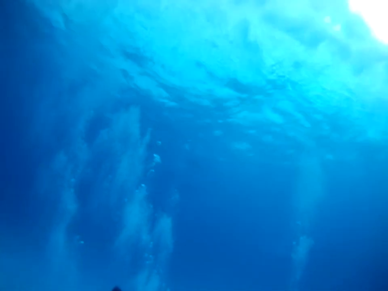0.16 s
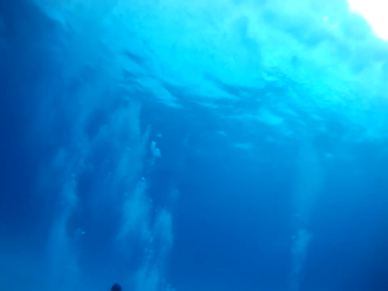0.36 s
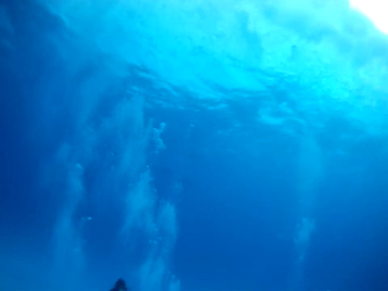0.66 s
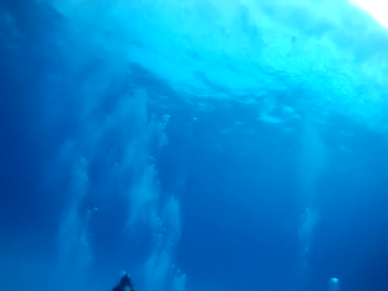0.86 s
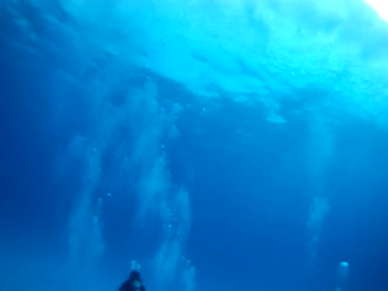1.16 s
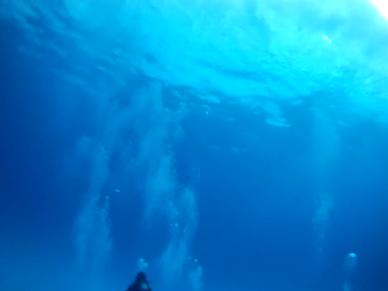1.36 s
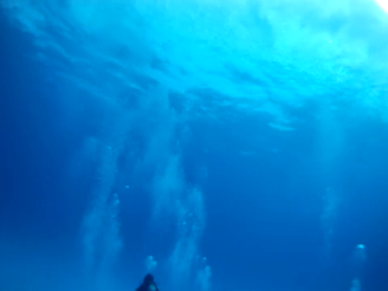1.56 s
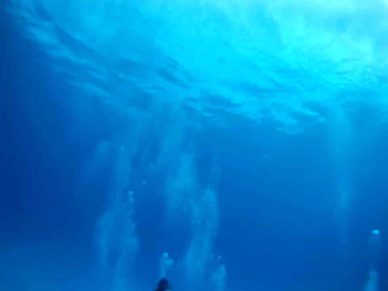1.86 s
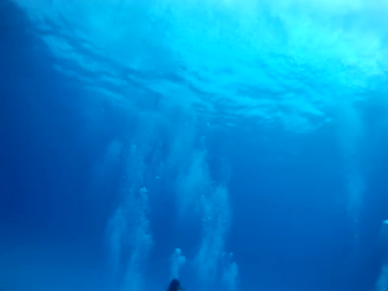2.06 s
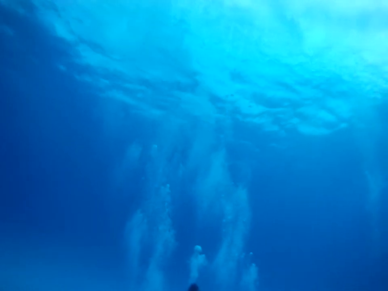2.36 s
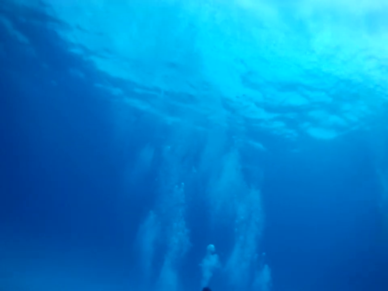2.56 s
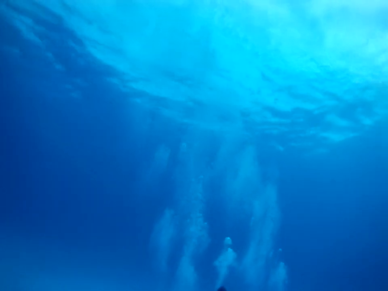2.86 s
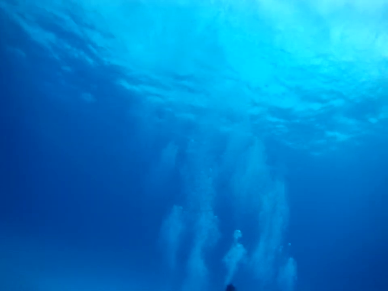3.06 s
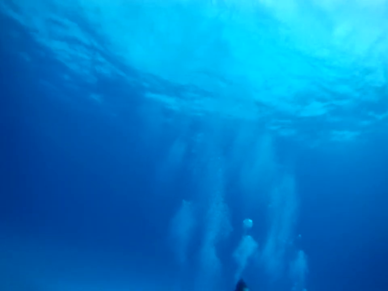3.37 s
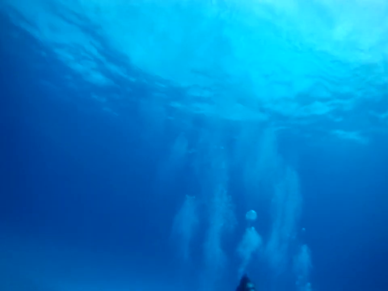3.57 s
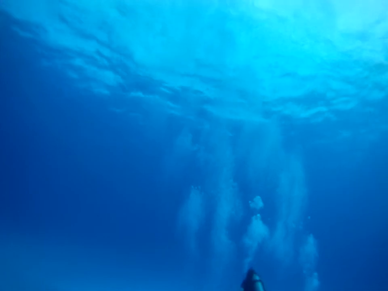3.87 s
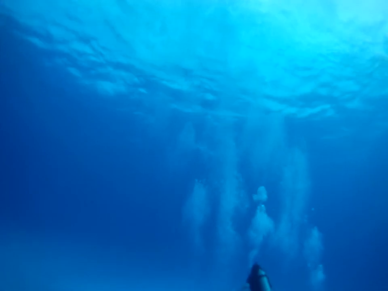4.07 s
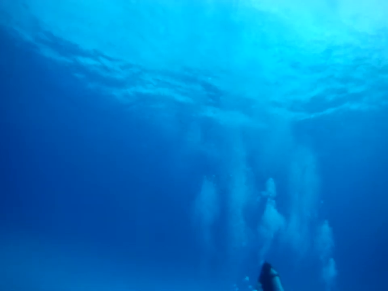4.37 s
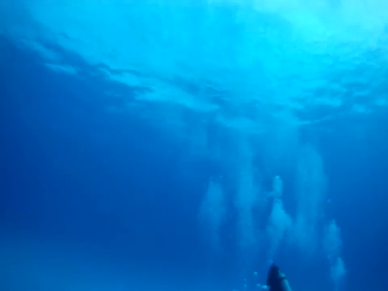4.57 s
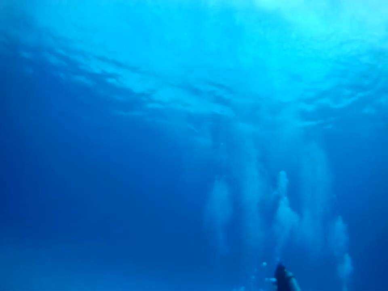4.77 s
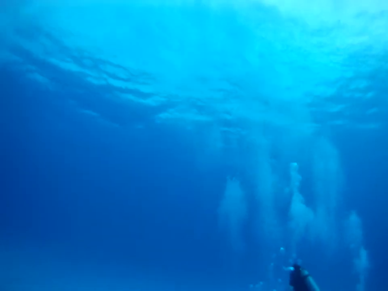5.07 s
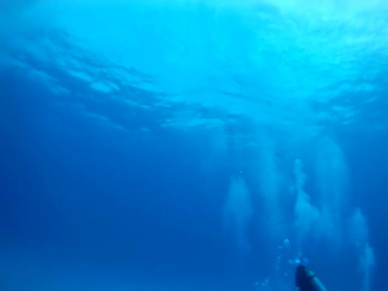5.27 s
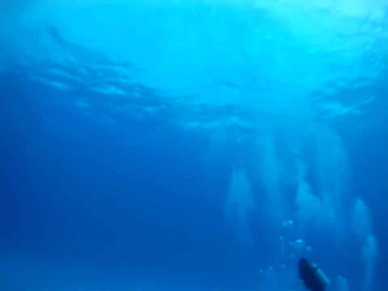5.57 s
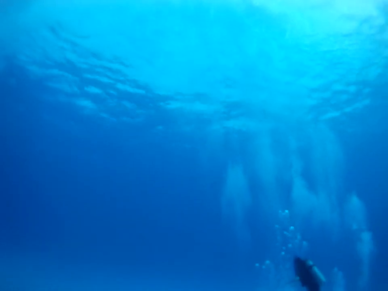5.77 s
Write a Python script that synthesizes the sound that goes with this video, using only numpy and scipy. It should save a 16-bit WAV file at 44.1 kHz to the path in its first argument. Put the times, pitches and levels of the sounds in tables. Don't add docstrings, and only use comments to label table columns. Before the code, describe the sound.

Heard from underwater, two low boat engines hum slightly out of step, pulsing several times a second. Loudest at the start with propeller hiss, they fade unevenly. Hollow bubble knocks ring in a small camera housing; deep gurgles, gulps and bright pings grow more noticeable later over a soft wash.

```python
import sys
import numpy as np
from scipy import signal
from scipy.fft import rfft
from scipy.io import wavfile
from scipy.ndimage import uniform_filter1d

SR = 44100
rng = np.random.default_rng(int(sys.argv[2]) if len(sys.argv) > 2 else 0)


def output_pcm(signal):
    pcm = np.clip(np.atleast_2d(signal).T, -1, 1) * 32767
    wavfile.write(sys.argv[1], SR, np.round(pcm).astype(np.int16))


def elevation(decibels):
    levels = np.asarray(decibels, float)
    return 10 ** (levels / 20)


N = 261052


def read(points, hz):
    f, value = np.transpose(points)
    return np.interp(np.log(hz + 1), np.log(f + 1), value)


def curves(rows):
    s, *columns = np.transpose(rows)
    return [np.interp(np.arange(N) / SR, s, column) for column in columns]


def spells(rows, rest_db):
    t = np.arange(N) / SR
    edge_s = 0.21
    lifts = []
    for start, end, db in rows:
        inside = np.clip(0.5 + np.minimum(t - start, end - t) / edge_s, 0, 1)
        lifts.append(inside * (db - rest_db))
    return rest_db + np.max(lifts, axis=0)


def in_band(x, lo_hz, hi_hz):
    z, hz = rfft(x), np.fft.rfftfreq(len(x), 1 / SR)
    power = np.sum(abs(z[(hz > lo_hz) & (hz < hi_hz)]) ** 2)
    return x / (np.sqrt(2 * power) / len(x))


def add(mix, s, sound):
    part = mix[round(s * SR):][:len(sound)]
    part += sound[:len(part)]


def resonate(x, hz, width):
    turn = np.exp(2j * np.pi * hz * np.arange(len(x)) / SR)
    r = np.exp(-np.pi * width / SR)
    return 2 * (turn * signal.lfilter([1 - r], [1, -r], x / turn)).real


def noise(shape_db, size, patchy_db, flicker_db):
    frames, hz = 4 * N // size + 5, np.fft.rfftfreq(size, 1 / SR)
    a, b, patches = rng.standard_normal((frames, len(hz), 3)).T
    patches = uniform_filter1d(uniform_filter1d(patches, size=6, axis=0), size=8, axis=1)
    gusts = uniform_filter1d(rng.standard_normal(frames), size=6)
    field_db = shape_db(hz)[:, None] + patchy_db * patches / patches.std()
    field_db = field_db + flicker_db * gusts / gusts.std()
    return signal.istft((a + 1j * b) * elevation(field_db), nperseg=size, noverlap=size * 3 // 4)[1][:N]


def engines():
    # t/s, slow engine f/Hz, fast engine f/Hz
    speed = [(0.0, 53.87, 60.24), (0.47, 53.8, 60.65), (0.738, 52.89, 59.94), (1.302, 55.76, 60.52),
             (1.587, 51.89, 60.88), (1.921, 54.65, 60.94), (2.376, 52.95, 60.89), (2.85, 54.26, 61.01),
             (3.277, 53.14, 60.4), (3.641, 54.31, 61.29), (4.701, 52.93, 61.05), (4.907, 52.27, 60.77),
             (5.073, 53.16, 59.38), (5.329, 54.06, 60.95), (5.92, 53.69, 59.91)]
    start_turn = (.686, .12)
    # t/s, slow engine level/dB, fast engine level/dB
    hum_levels = [(0.0, -21.5, -20.6), (0.35, -20.4, -18.3), (0.6, -20.3, -22.5), (1.16, -25.1, -27.3),
                  (1.58, -30.1, -33.6), (1.82, -24.6, -25.6), (2.0, -21.4, -27.9), (2.23, -22.7, -33.1),
                  (2.79, -27.9, -29.7), (3.18, -32.9, -34.8), (3.65, -28.3, -35.6), (3.86, -31.2, -39.9),
                  (4.08, -33.2, -37.3), (4.44, -34.0, -34.8), (4.97, -33.4, -36.6), (5.27, -37.8, -41.1),
                  (5.58, -35.4, -40.1), (5.92, -40.0, -49.2)]
    # multiple, level/dB under its hum
    part_orders = [
        (.75, -20),
        (2.25, -28),
    ]
    # start t/s, end t/s, level/dB
    slow_x2 = [(.9, 2.05, -46), (3.2, 4.2, -53)]
    fast_x2 = [(.28, 0.502, -36), (0.698, 2.097, -38), (2.45, 3.01, -45), (4.3, 4.6, -47),
               (5.2, 5.86, -46.5)]
    slow_x3 = [(1.35, 2.0, -46), (2.447, 4.3, -46.5), (5.4, 5.9, -54)]
    fast_x3 = [(2.5, 4.07, -51), (5.0, 5.8, -54)]

    slow, fast = [2 * np.pi * (start + np.cumsum(hz) / SR)
                  for start, hz in zip(start_turn, curves(speed))]
    slow_db, fast_db = curves(hum_levels)
    hum = elevation(slow_db) * np.cos(slow) + elevation(fast_db) * np.cos(fast)
    for multiple, db in part_orders:
        hum += elevation(fast_db + db) * np.cos(multiple * fast)
    shake = uniform_filter1d(uniform_filter1d(rng.standard_normal(N), size=1500), size=1500)
    hum *= elevation(0.44 * shake / shake.std())
    higher = ((slow_x2, 2 * slow), (fast_x2, 2 * fast), (slow_x3, 3 * slow), (fast_x3, 3 * fast))
    for rows, phase in higher:
        hum += elevation(spells(rows, rest_db=-59)) * np.cos(phase)
    return np.sqrt(2) * hum


def housing_db(hz):
    # f/Hz, level/dB per Hz
    hiss_colour = [(60, -43), (250, -15.5), (600, -3.5), (1000, -1.5), (1500, -3.5), (2200, 0.5),
                   (2700, -11), (3500, -14.5), (4300, -22), (5200, -25), (5700, -29.5), (6000, -41)]
    # f/Hz, width/Hz, level/dB
    bumps = [(1218, 36.3, -24.5), (1510, 71, 3), (1604, 26, -10.5), (1826, 31.5, -21), (1890, 28, 3.5),
             (1996, 30, -8.5), (2165, 144, 2), (2570, 34, -5), (2980, 55, -6.5), (3310, 100, 1.5),
             (3654, 120, 5), (4040, 150, 3.5), (4670, 190, -4.5), (5130, 180, 5.5)]
    return read(hiss_colour, hz) + sum(db * np.exp(-0.5 * ((hz - f) / w) ** 2) for f, w, db in bumps)


def propeller(hiss_db, ring_db):
    # f/Hz, width/Hz, level/dB
    modes = [
        (832, 47, 15),
        (861.5, 15, 6.5),
    ]
    hiss = in_band(noise(housing_db, size=1024, patchy_db=1.0, flicker_db=0.44), 1390, 4500)
    lumps = uniform_filter1d(rng.standard_normal(N), size=900)
    drive = rng.standard_normal(N) * elevation(1.15 * lumps / lumps.std())
    ring = np.zeros(N)
    for f, width, db in modes:
        ring += elevation(db) * resonate(resonate(drive, f, 5.2 * width), f, width)
    return elevation(hiss_db) * (hiss + elevation(ring_db - 1.5) * ring / ring.std())


def bubble(hz, rise, t60, sag=0.022):
    t = np.arange(int((rise + t60) * SR)) / SR
    swell = np.sin(np.pi / 2 * np.minimum(t / rise, 1)) ** 2
    decay = elevation(-60 * np.maximum(t - rise, 0) / t60)
    turns = np.cumsum(hz * (1 + sag * np.exp(-8 * t / t60))) / SR
    return swell * decay * np.sin(2 * np.pi * turns)


def near_bubbles():
    # t/s, peak level/dB, f/Hz, ring time [cycles]
    pings = [(.0769, -23, 2290, 32), (.5766, -29, 2020, 42), (1.5935, -30, 1285, 50),
             (4.051, -33, 3300, 27), (2.5675, -29, 2000, 26), (2.6423, -30.5, 1680, 75),
             (2.6958, -38, 4080, 70), (2.949, -29, 2800, 22), (2.953, -32, 1350, 80),
             (2.982, -27.5, 2950, 18), (3.442, -30, 1520, 41), (3.570, -48, 5080, 65),
             (3.6964, -34, 1700, 33), (3.6954, -26, 1040, 19), (3.812, -30, 1520, 29),
             (3.8759, -23, 1650, 33), (3.9447, -22, 1420, 27), (4.007, -34, 5100, 60),
             (4.0883, -24, 2360, 54), (4.236, -30, 1400, 40), (4.2987, -22, 1420, 53),
             (4.299, -41, 5200, 45), (4.4687, -46, 4859, 45), (4.517, -36, 4500, 14),
             (4.518, -31.5, 3630, 100), (4.6989, -31.5, 1663, 46), (4.7785, -28, 1840, 39),
             (4.806, -26.5, 1650, 51), (4.8895, -31, 1260, 32), (5.0581, -35, 1170, 75)]
    gulps = [(.715, -39, 284, 30), (1.036, -25, 620, 32), (1.241, -26, 720, 22), (2.3145, -32, 270, 13),
             (1.927, -23, 360, 28), (2.324, -28, 540, 25), (2.732, -31, 550, 20), (2.495, -30, 430, 25),
             (2.485, -27, 150, 5), (2.794, -25, 780, 18), (3.052, -30, 544, 40), (3.178, -24.5, 690, 67),
             (3.3341, -27.5, 350, 17), (2.415, -30.5, 450, 36), (3.6945, -24.5, 444, 23),
             (3.8905, -29, 671, 12), (4.0651, -31, 340, 15), (4.104, -28, 660, 45), (4.242, -32, 220, 25),
             (4.7, -27, 730, 12), (4.364, -33, 410, 50), (4.652, -32, 640, 40), (5.1, -30, 530, 55),
             (5.136, -26.5, 700, 24), (5.279, -30, 670, 30), (5.368, -31, 570, 25), (5.7282, -31, 750, 42),
             (5.7262, -28, 486, 59), (5.724, -30, 214, 14), (5.866, -33, 390, 13)]
    knocks = [(.066, -16, 860, 40), (.092, -19, 846, 45), (.136, -22, 810, 90), (.166, -32, 866, 38),
              (.222, -20, 826, 33), (.294, -21.5, 836, 84), (.352, -23, 832, 26), (.412, -23.5, 873, 71),
              (.87, -26.5, 818, 71), (.928, -26.5, 800, 52), (1.189, -22, 817, 22), (1.318, -25, 840, 50),
              (1.347, -24, 837, 79), (1.398, -28, 890, 39), (2.73, -27, 850, 30), (2.5249, -28, 895, 20),
              (2.622, -24, 845, 40), (2.640, -20, 825, 49), (2.838, -26, 860, 70), (3.306, -24, 827, 60),
              (3.766, -28, 940, 24), (3.818, -28, 850, 43), (3.907, -27, 850, 23), (4.039, -35, 980, 35),
              (4.270, -29, 880, 95), (4.695, -23, 870, 41), (4.729, -25, 833, 21), (4.797, -26, 862, 70),
              (5.316, -27, 830, 20), (5.355, -27.5, 895, 40)]
    out = np.zeros(N)
    for rows, rise_cycles in ((pings, 3), (gulps, 1.7), (knocks, 4)):
        for s, db, hz, cycles in rows:
            rise = (rise_cycles + 0.05 * cycles) / hz
            add(out, s, elevation(db + 2.0) * bubble(hz, rise, cycles / hz))
    return out


def wash(level_db, cloud_db, per_s=140):
    # f/Hz, level/dB per Hz
    wash_colour = [(30, -9), (70, 2), (130, 3.5), (200, -10), (300, 0.5), (450, 1), (700, 1), (950, -6.5),
                   (1300, -11.5), (2500, -32), (6000, -39)]
    murmur = noise(lambda hz: read(wash_colour, hz), size=2048, patchy_db=3.0, flicker_db=-1.97)
    pitches = np.geomspace(170, 1900, 24)
    size = elevation(2.5 * np.minimum(rng.exponential(1, N), 4)) * (rng.random(N) < per_s / SR)
    kind = rng.integers(0, len(pitches), N)
    cloud = np.zeros(N)
    for k, hz in enumerate(pitches):
        one = bubble(hz, 2.54 / hz, 28 / hz)
        cloud += elevation(read(wash_colour, hz)) * signal.oaconvolve(size * (kind == k), one)[:N]
    gurgles = elevation(cloud_db) * in_band(cloud, 147, 860)
    return elevation(level_db - 2.5) * (in_band(murmur, 230, 604) + gurgles)


def gurgle(level_db):
    # f/Hz, level/dB per Hz
    deep_colour = [(60, -30), (110, -11), (150, -1.5), (230, -5), (300, -15), (600, -58)]
    deep = noise(lambda hz: read(deep_colour, hz), size=2048, patchy_db=2.0, flicker_db=1.5)
    return elevation(level_db - 2.0) * in_band(deep, 170, 237)


def scene():
    # t/s, level/dB
    away = [(0.0, -27.5), (.45, -29.5), (.95, -33), (1.7, -34.5), (2.2, -36.5), (3.8, -36.5), (4.6, -38.5),
            (5.3, -42.5), (5.65, -40), (5.92, -38.5)]
    # start t/s, end t/s, level/dB
    ringing = [(0.0, .72, 2.5), (.85, 1.55, 3.5), (2.45, 3.05, 2.5), (3.15, 3.4, 2.5), (3.75, 4.4, 3.5),
               (4.45, 5.5, 3.5)]
    # start t/s, end t/s, deep gurgle level/dB
    columns = [(0.0, .55, -49), (1.1, 1.5, -51), (1.95, 2.15, -44.5), (2.3, 3.0, -41), (3.35, 3.95, -42),
               (4.1, 4.75, -43.5), (5.15, 5.45, -46), (5.65, 5.92, -47)]
    away_db, = curves(away)
    column_db = spells(columns, rest_db=-52)
    near_db = column_db + 50.5
    wash_db = -38.5 + 0.46 * np.minimum(away_db + 36.5, 0) + 0.12 * near_db
    cloud_db = -5 + 0.27 * near_db
    boat = engines() + propeller(away_db, spells(ringing, rest_db=-2.0))
    bubbles = near_bubbles() + wash(wash_db, cloud_db) + gurgle(column_db)
    return (boat + bubbles)[None]


def roll_off(x):
    return signal.sosfilt(signal.butter(12, 15360, fs=SR, output="sos"), x)


def record(dry):
    slow = signal.resample_poly(dry, 40, 147, axis=1, window=("kaiser", 5))
    held = np.repeat(slow, 4, axis=1)
    back = signal.resample_poly(held, 147, 160, axis=1)
    mix = np.pad(back, ((0, 0), (0, 8)))[:, :N]
    return roll_off(mix)


dry = scene()
out = record(dry)
output_pcm(out)
```